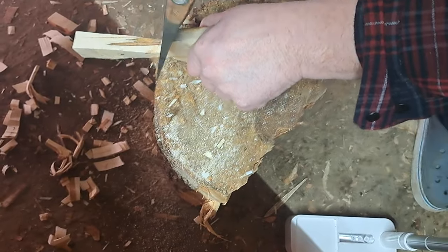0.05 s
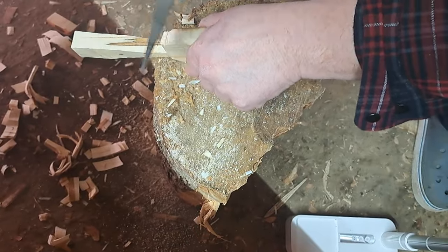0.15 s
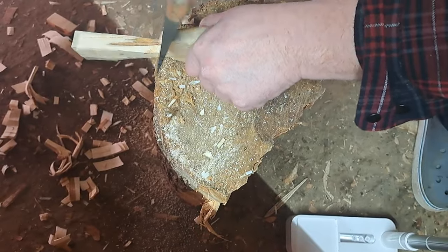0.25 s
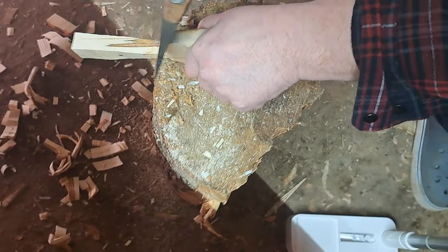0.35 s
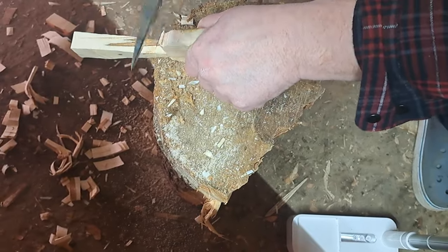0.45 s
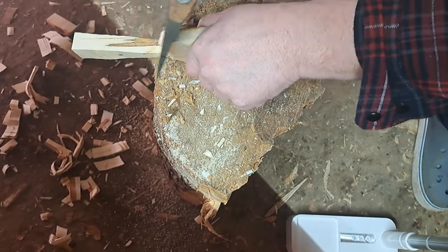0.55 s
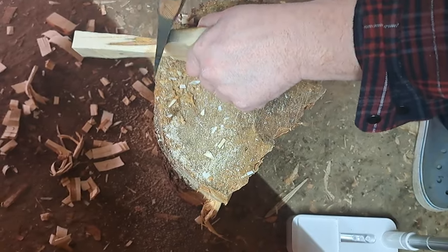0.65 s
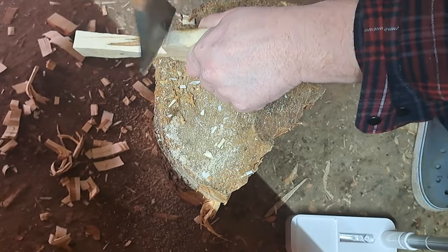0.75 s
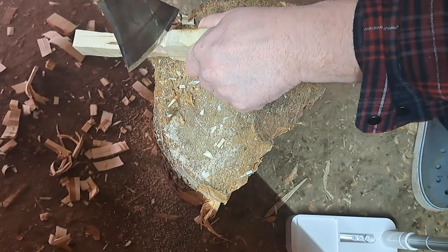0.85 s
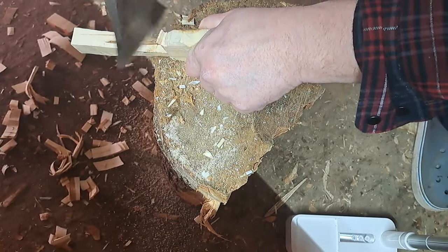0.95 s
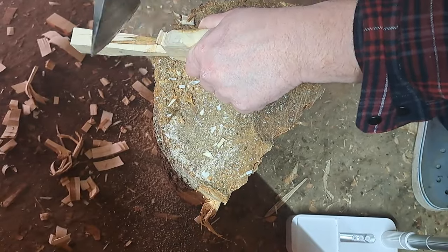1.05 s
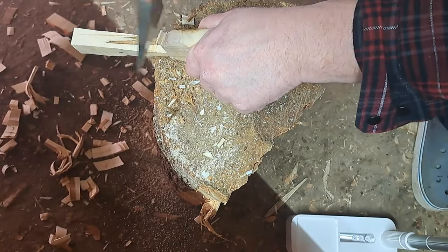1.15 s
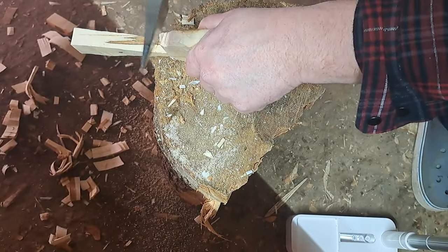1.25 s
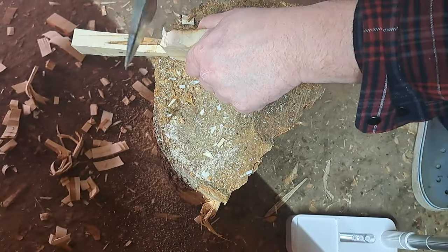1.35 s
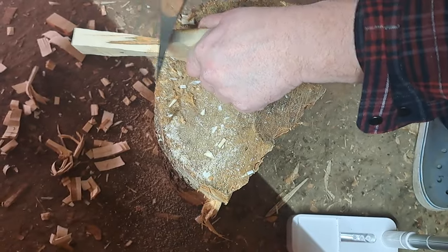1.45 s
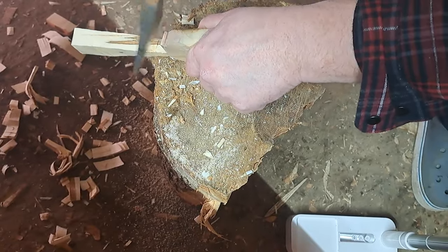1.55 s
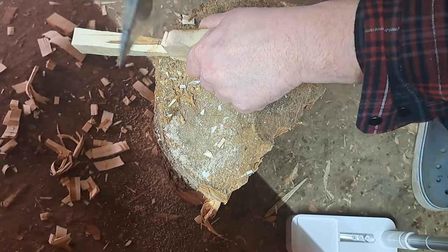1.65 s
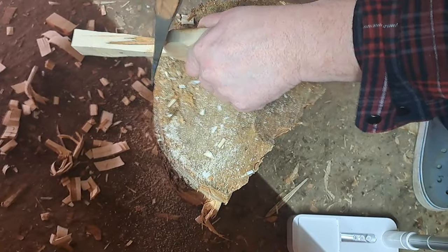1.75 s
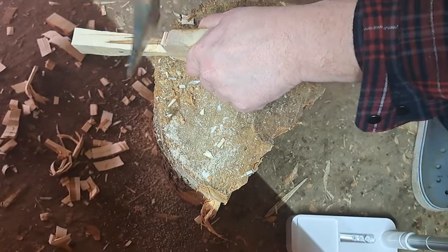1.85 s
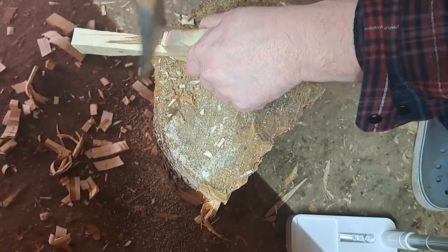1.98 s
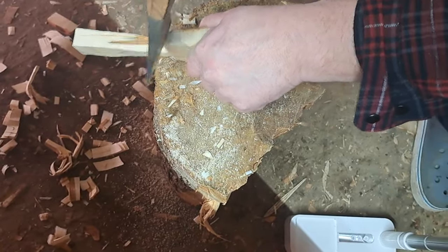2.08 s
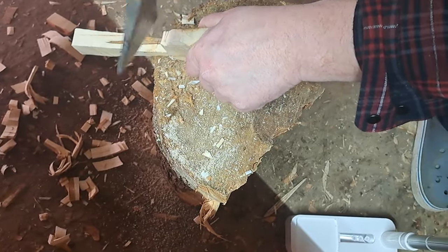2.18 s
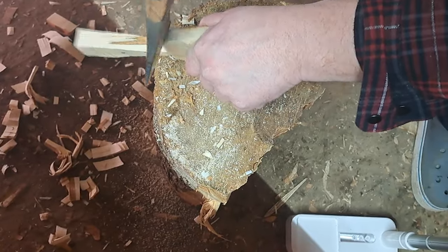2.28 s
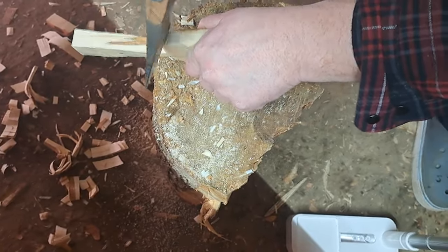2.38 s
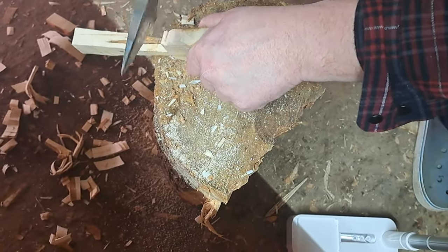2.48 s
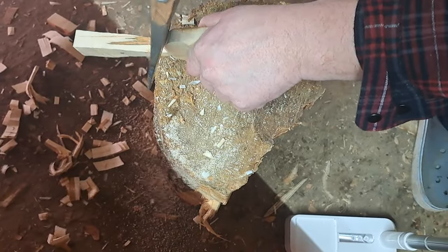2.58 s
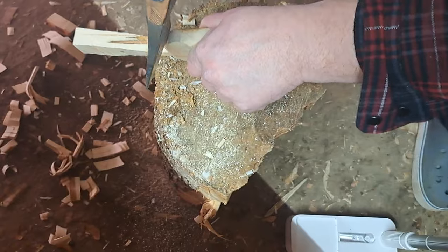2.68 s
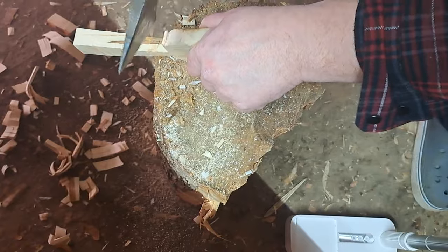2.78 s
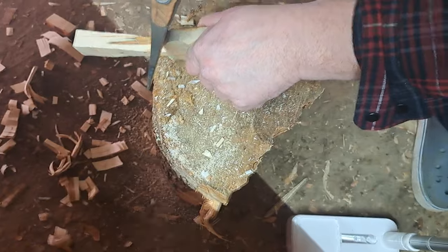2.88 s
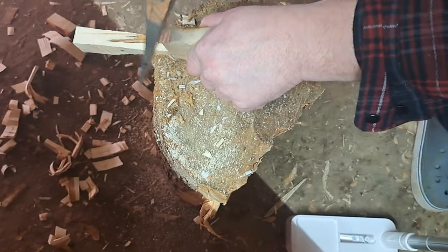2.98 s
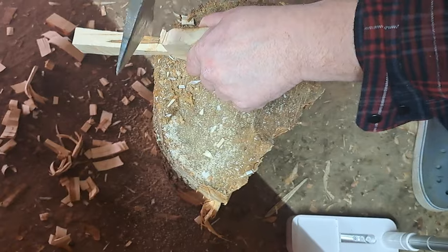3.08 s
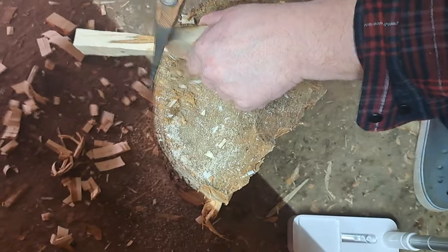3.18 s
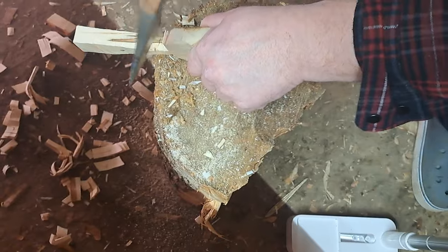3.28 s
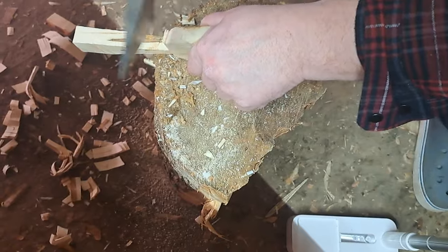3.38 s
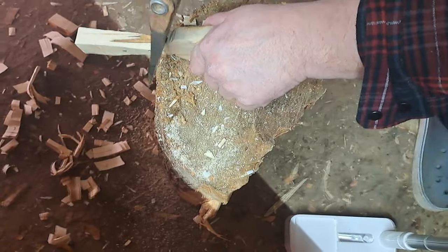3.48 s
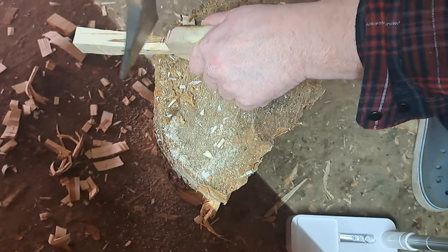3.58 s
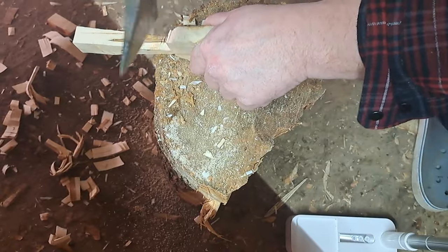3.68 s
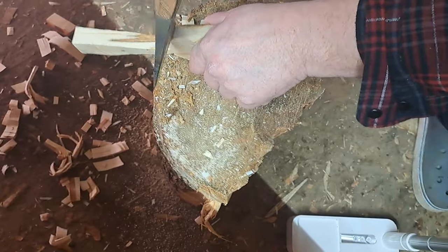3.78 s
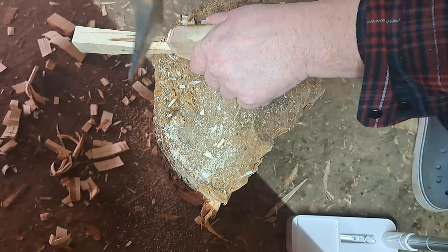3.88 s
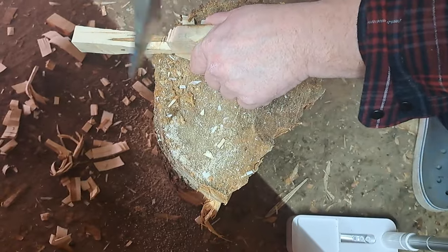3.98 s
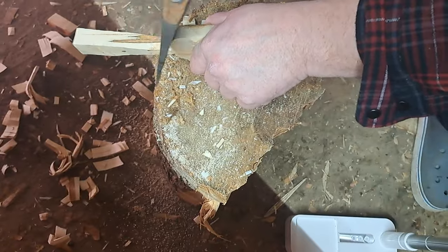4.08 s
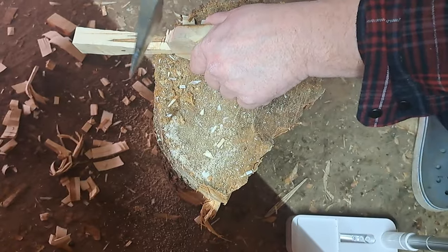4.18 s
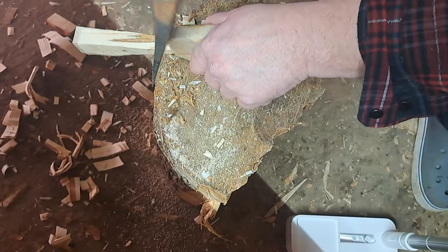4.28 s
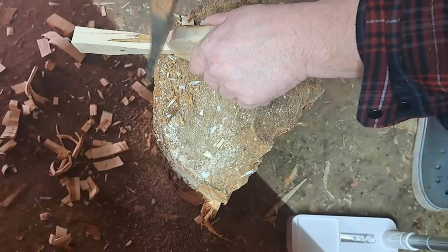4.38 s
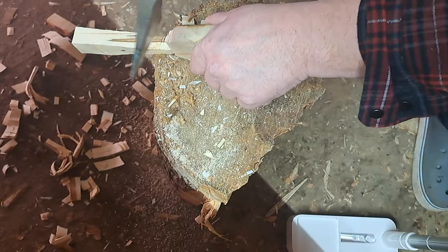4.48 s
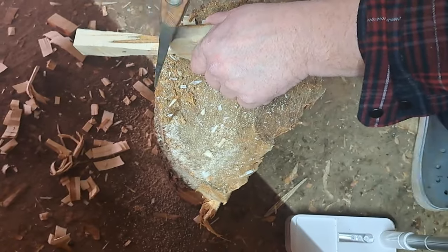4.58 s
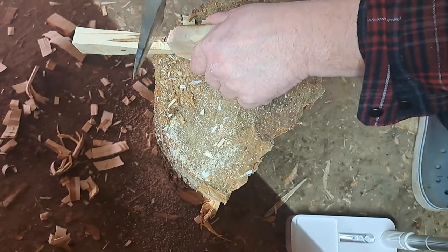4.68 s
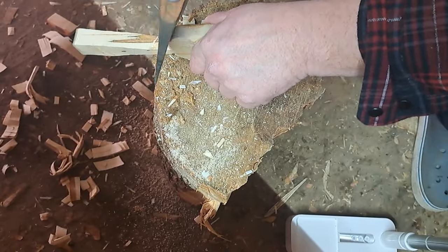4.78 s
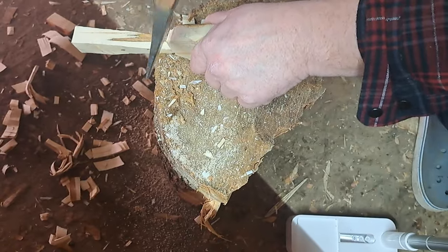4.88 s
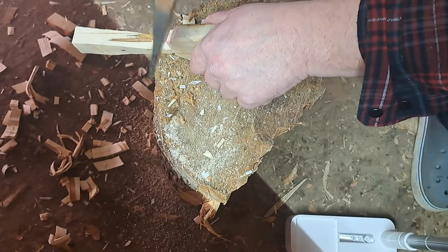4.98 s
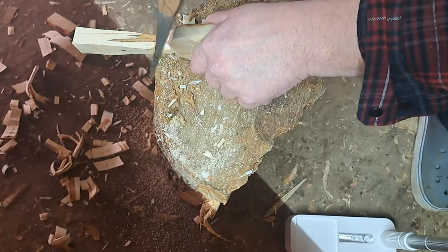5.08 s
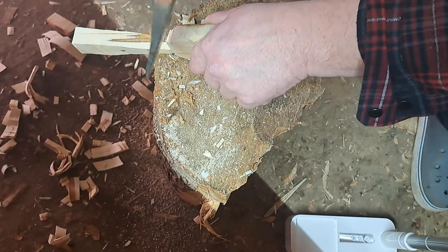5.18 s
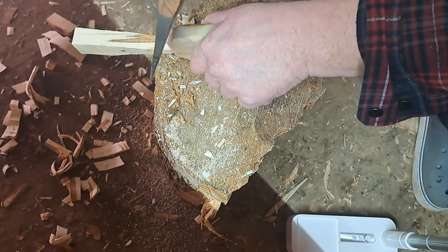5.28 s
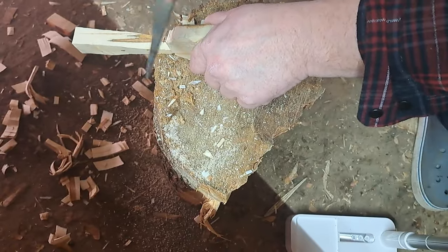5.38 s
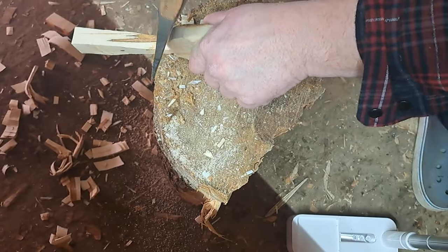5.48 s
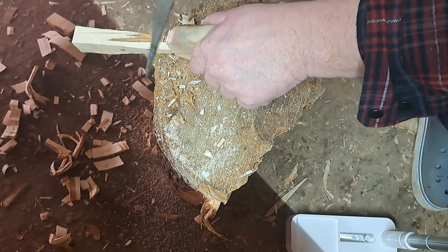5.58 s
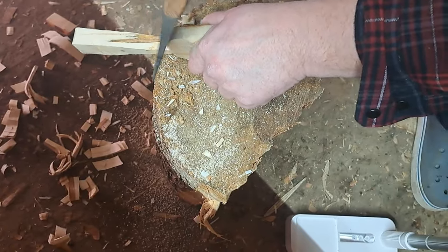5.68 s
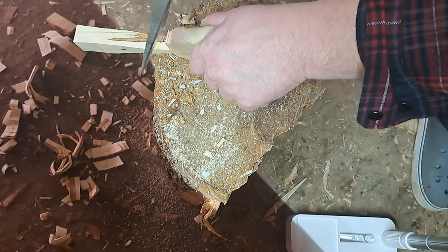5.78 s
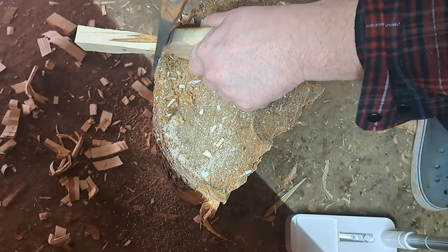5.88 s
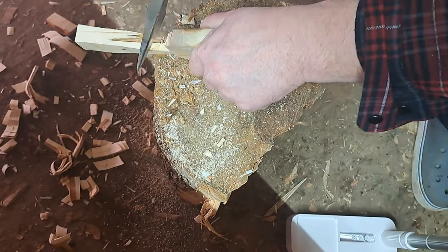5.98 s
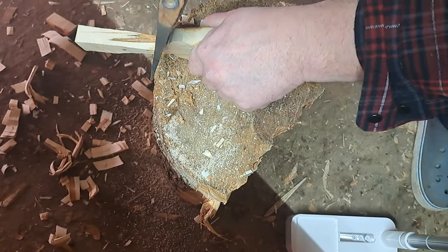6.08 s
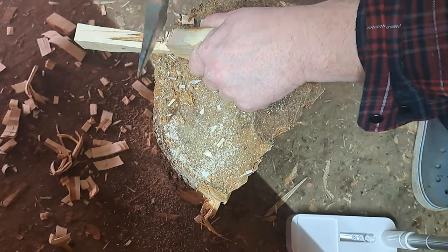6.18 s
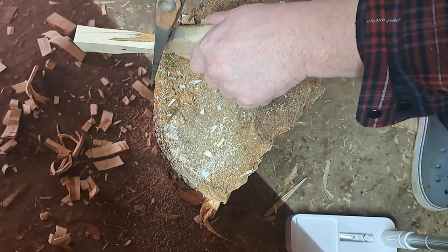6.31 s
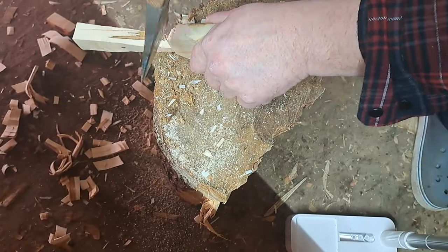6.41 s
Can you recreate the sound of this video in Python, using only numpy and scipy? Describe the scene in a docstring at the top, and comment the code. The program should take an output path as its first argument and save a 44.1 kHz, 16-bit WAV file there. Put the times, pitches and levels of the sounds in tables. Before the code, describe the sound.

In a small workshop with faint low rumble and hiss, a small axe chops a wooden spoon blank on a block, heard close in stereo. Three hard, clacking strokes fall at 0.0, 0.3 and 0.6 s, each a short crack of fibres followed at once by a low block thump and brief rattle. A pause holds only tiny chip ticks near 0.8 and 1.0 s. A light tap at 1.45 s restarts the chopping, with a soft wooden rub at 1.65 s. Strokes then come about every 0.29 s, growing to bright, strong cracks at 2.9 and 3.2 s; a chip snaps off at 3.5 s and the blank slides softly near 3.7 s. From 3.8 s the strokes are lighter, with a knockier block, quickening to about five per second. The last, from 5.9 to 6.3 s, are soft, crisp slices with faint splitting snaps.

```python
"""Chopping a spoon blank with a small axe

A small axe chops a wooden spoon blank held on a block, in quick runs, in a small workshop with rumble and hiss.
Each stroke is a noise burst of snapping fibres that excites the damped modes of the blank; then the block's
decaying modes knock and thump on the floor. After hard strokes the blank rattles, as a series of short contacts.
Now and then the blank slides, a chip splits off late and twangs, or a chip lands with a tick."""
import sys
import numpy as np
from scipy import signal
from scipy.fft import rfft, irfft
from scipy.io import wavfile
from scipy.ndimage import uniform_filter1d

SR = 44100
rng = np.random.default_rng(int(sys.argv[2]) if len(sys.argv) > 2 else 0)


def wav_out(sig):
    """Save sig, one row per channel (or a flat mono array), as 16-bit PCM at SR to the path in sys.argv[1]."""
    wavfile.write(sys.argv[1], SR, np.round(np.clip(np.atleast_2d(sig).T, -1, 1) * 32767).astype(np.int16))


N = 284443

TIME = np.arange(SR) / SR  # one second of ringing [s]
SHORT = TIME[:SR // 5]  # the first fifth of it [s]

# Levels are those in the mix, ahead of the gain curve in record().
# axe strokes: (time [s], bite before the edge stops [s], pitch of the blank [Hz], load on the block [dB],
# clack level [dB], brightness [dB])
STROKES = [(0.0139, 0.002, 1555, -20, -16.5, -14), (0.301, 0.0027, 1520, -23, -16.5, 1.5),
           (0.585, 0.0011, 1328, -22, -25, -12), (1.4553, 0.00094, 786, -34, -37.5, 7),
           (1.7603, 0.0018, 1075, -25.5, -32.5, -2.5), (2.0439, 0.0015, 813, -19.5, -25.5, 1.5),
           (2.3283, 0.0018, 866, -20, -23.5, -1), (2.613, 0.0014, 1170, -20, -21, -1),
           (2.902, 0.0041, 1710, -21, -18, 11.5), (3.19, 0.0049, 1645, -23.5, -16, -1),
           (3.469, 0.0025, 1290, -23.5, -25.5, 2), (3.797, 0.0014, 851, -32.5, -35.5, -4),
           (4.0726, 0.00096, 1486, -36, -31.5, 2.5), (4.333, 0.00095, 1206, -30, -29.5, -5.5),
           (4.581, 0.0015, 875, -31, -42, 14), (4.82, 0.0016, 1156, -28, -32, -2),
           (5.047, 0.0013, 880, -31.5, -29, -5.5), (5.2537, 0.0019, 1180, -30, -26, -18),
           (5.461, 0.0023, 1540, -29, -28, -8.5), (5.669, 0.0018, 1213, -26.5, -27, -16.5),
           (5.881, 0.0038, 1247, -31, -47, 14), (6.1, 0.0026, 1273, -30, -42.5, 14.5),
           (6.322, 0.003, 1230, -29, -42, -1)]
# chips splitting off late, shortly after the edge has stopped: (time [s], pitch [Hz], crack level [dB])
CHIP_SPLITS = [(3.4823, 4350, -35), (4.342, 1210, -54), (4.591, 898, -63), (4.827, 1320, -62),
               (5.6831, 1300, -52), (5.9073, 5620, -47), (5.9127, 6330, -45), (6.1271, 5220, -44),
               (6.3449, 5060, -45.5), (6.347, 5180, -45.5)]


def from_db(db):
    """Logarithmic level turned into an amplitude ratio."""
    return 10 ** (np.asarray(db) / 20)


def at_hz(table, hz):
    """Interpolation of every column of a table at one point of a logarithmic frequency axis."""
    freqs, *columns = np.transpose(table)
    return [np.interp(np.log(hz), np.log(freqs), column) for column in columns]


def band(x, low_hz, high_hz, order=3):
    """Causal Butterworth band-pass."""
    sos = signal.butter(order, [low_hz, high_hz], "band", fs=SR, output="sos")
    return signal.sosfilt(sos, x + 1e-18)


def pan(db):
    """Level-difference stereo: left and right gains that differ by db."""
    return from_db(np.array([[db], [-db]]) / 2)


def at_level(x, db, seconds):
    """Rms normalization: the loudest stretch of the given length gets this level."""
    window = max(1, int(seconds * SR))
    power = uniform_filter1d(np.mean(x ** 2, axis=0), window, mode="constant")
    return x * from_db(db) / np.sqrt(power.max() + 1e-20)


def add(out, s, sound):
    """Superposition: mixes a sound in at time s."""
    start = max(0, int(s * SR))
    out[:, start:start + sound.shape[-1]] += sound[..., :N - start]


def convolve(x, response):
    """Linear system: x convolved with an impulse response, keeping one second at most."""
    return signal.fftconvolve(np.atleast_2d(x), np.atleast_2d(response), axes=-1)[:, :SR]


def resonance(x, hz, width_hz):
    """Damped mode as a two-pole filter, with gain 1 at its top."""
    r = np.exp(-np.pi * width_hz / SR)
    poles = [1, -2 * r * np.cos(2 * np.pi * hz / SR), r * r]
    return (1 - r * r) / 2 * signal.lfilter([1, 0, -1], poles, x + 1e-18)


def ringing(modes, t, tuning=1):
    """Modal synthesis: the exponentially decaying sines of a struck body."""
    return sum(from_db(db - 60 * t / t60) * np.sin(2 * np.pi * hz * tuning * t) for hz, db, t60 in modes)


def noise_bands(size):
    """Half-octave bands of noise, uncorrelated left and right: (centre [Hz], noise)."""
    edges = np.geomspace(22, 18000, 20)
    # neighbouring bands take turns between two independent noises
    white = rng.standard_normal((2, 2, size))
    return [(np.sqrt(low * high), band(white[k % 2], low, high, order=2))
            for k, (low, high) in enumerate(zip(edges, edges[1:]))]


def air():
    """Broadband background noise: low rumble and faint hiss, slowly swelling and sinking below 8 kHz."""
    # spectrum of still air and hiss: (frequency [Hz], relative density [dB per Hz])
    spectrum = [(25, -9), (60, -3.5), (130, -12.5), (300, -12.5), (700, -25), (1400, -25.5), (2300, -25.5),
                (4500, -29), (7000, -41), (9500, -53.5), (12700, -30.5), (15500, -52.5)]
    # course of the swell, of which only the deviation from its mean counts: (time [s], level [dB])
    course = [(0.0, -56), (0.14, -68), (1.11, -76), (1.99, -56.5), (3.2, -56.5), (4.26, -67.5),
              (5.84, -76.5), (6.45, -57)]
    swing_share, steady_above_hz, air_db = .65, 8000, -54
    times, db = np.transpose(course)
    swing_db = swing_share * np.interp(np.arange(N) / SR, times, db - db.mean())
    swell = from_db(swing_db)
    total = 0
    for hz, noise in noise_bands(N):
        coloured = noise * from_db(*at_hz(spectrum, hz))
        total = total + coloured * (swell if hz < steady_above_hz else 1)
    return at_level(total, air_db, 2)


def hiss():
    """Resonantly filtered noise: two steady faint bands, uncorrelated left and right."""
    # bands standing out of the hiss: (frequency [Hz], width of each of two equal filters [Hz], level [dB])
    hiss_bands = [(2240, 520, -75.5), (12500, 1900, -78)]
    out = 0
    for hz, width_hz, db in hiss_bands:
        once = resonance(rng.standard_normal((2, N)), hz, width_hz)
        out = out + at_level(resonance(once, hz, width_hz), db, 2)
    return out


def workshop(build_s=0.0073):
    """Diffuse reverberation: noise with a quick early decay over a faint long one, at unit energy."""
    # early decay: (frequency [Hz], t60 [s])
    early_decay = [(50, 0.75), (200, 0.13), (500, 0.25), (1400, 0.12), (4000, 0.15), (8000, 0.089),
                   (14000, 0.072)]
    # faint late ring: (frequency [Hz], t60 [s], level relative to the early part [dB])
    late_decay = [(50, 1.1, -10), (200, .75, -17), (500, .6, -18), (1400, .46, -28), (4000, .46, -22),
                  (8000, .4, -24), (14000, .3, -27)]
    # balance of the diffuse sound: (frequency [Hz], left minus right [dB])
    balance = [(60, -4.5), (300, 1.5), (1500, -5.5), (4000, -6.5), (8000, 2), (14000, 7)]
    response = 0
    for hz, noise in noise_bands(SR):
        (early_t60,), (late_t60, late_db) = at_hz(early_decay, hz), at_hz(late_decay, hz)
        decay = from_db(-60 * TIME / early_t60) + from_db(late_db - 60 * TIME / late_t60)
        response = response + noise * decay * pan(*at_hz(balance, hz))
    response = response * (1 - np.exp(-TIME / build_s))
    return response / np.sqrt(np.sum(response ** 2) / 2)


def slides():
    """Friction noise: wood rubs softly on wood as the blank is shifted on the block."""
    # rubs with a bell-shaped course: (centre time [s], standard deviation [s], level at the centre [dB])
    rubs = [(1.646, 0.022, -54), (3.672, 0.048, -58.5)]
    t = np.arange(N) / SR
    pressure = sum(from_db(db) * np.exp(-.5 * ((t - s) / length) ** 2) for s, length, db in rubs)
    return pressure * at_level(band(rng.standard_normal((2, N)), 330, 2900, order=2), 0, 1)


def landings(pitch_hz=4500):
    """Light impacts: fallen chips tick with one shared pitch and colour."""
    # chips landing: (time [s], level [dB])
    falls = [(.834, -68), (0.971, -68.5), (2.455, -60.5), (2.739, -56), (3.662, -58), (3.8823, -60.5),
             (4.6579, -62.5)]
    # relative level of each part: (clack [dB], crack [dB], tearing [dB])
    colour_db = (-1.5, 1.5, -2.5)
    return [(s, pitch_hz, *(db + np.array(colour_db))) for s, db in falls]


def splinters(pan_db=3):
    """Free vibration: each chip that splits off twangs for a moment at its pitch."""
    relative_db, t60_s = -2.5, 0.096  # relative to its crack
    out = np.zeros((2, N))
    for s, hz, db in CHIP_SPLITS:
        add(out, s, ringing([(hz, db + relative_db, t60_s)], SHORT) * pan(pan_db))
    return out


def splitting():
    """Size scaling of fracture: big, low-pitched chips come off with more clack, small ones with a bright snap."""
    even_hz = 7600  # here clack and crack are equal
    clack_db_per_octave, tearing_db = 10, 2.5
    return [(s, hz, db + clack_db_per_octave * np.log2(even_hz / hz), db, db + tearing_db)
            for s, hz, db in CHIP_SPLITS]


def bounces(pitch_hz=2400):
    """Repeated impact: a heavy stroke makes the blank bounce, more with the load, less after a deep bite."""
    # bounces against block and blade: (time after the edge stops [s], level relative to the load [dB])
    rebounds = [(0.0233, 0), (.048, -12.5), (0.0525, -2), (0.08, -21)]
    # relative level of each part: (clack [dB], crack [dB], tearing [dB])
    colour_db = (-2, -6.5, -23.5)
    bounce_above_db = -26.5  # lighter loads leave the blank lying still
    hold_db_per_s = 2201  # loss per second of bite: a deep edge holds the blank still
    contacts = []
    for s, bite_s, _, load_db, _, _ in STROKES:
        if load_db > bounce_above_db:
            for delay_s, relative_db in rebounds:
                db = load_db - hold_db_per_s * bite_s + relative_db
                contacts.append((s + bite_s + delay_s, pitch_hz, *(db + np.array(colour_db))))
    return contacts


def small_cracks(room, table, stop_s, room_db, bite_s=0.00074, creak_db=-30, top_hz=12000):
    """Brief contacts of wood, too light to move the block; rows are (time [s], pitch [Hz], three levels [dB])."""
    out = np.zeros((2, N))
    for s, pitch_hz, *levels in table:
        sound = crack(room, levels, pitch_hz, bite_s, stop_s, room_db, window_s=.004,
                      top_hz=top_hz, creak_db=creak_db)
        add(out, s, sound)
    return out


def sway(thump_db, detune=0.056):
    """Lightly damped floor modes: a slow ring started by the thump, growing less than the thump does."""
    # floor modes: (frequency before detuning [Hz], relative level [dB], t60 [s])
    floor_modes = [(45.47, 2, 0.81), (63.5, -19, .45), (79.6, 4, 0.14)]
    middling_sway_db, middling_thump_db, growth_share = -30, -29.5, .1
    swell = 1 - np.exp(-TIME / 0.0065)
    db = middling_sway_db + growth_share * (thump_db - middling_thump_db)
    floor = from_db(db) * swell * ringing(floor_modes, TIME, 1 + detune * rng.normal())
    return floor * np.array([[1], [-.6]])  # out of step at the two microphones


def block(room, levels, contact_s=0.002, room_db=-5, detune=0.019, thump_wall_db=-13, thump_room_db=-16):
    """Impact excitation: a soft push starts the block's modes; the walls reflect them, the lowest only weakly."""
    # block standing on the floor: (frequency before detuning [Hz], relative level [dB], t60 [s])
    block_modes = [(72.5, 3.5, 0.12), (96.4, -6.5, 0.21), (111, -5, 0.086), (142, -3, 0.06),
                   (156.2, 3, 0.12), (204.4, -5, 0.18), (235.3, -1.5, 0.087), (268.2, -6, 0.073),
                   (290.3, -1.5, 0.028), (382, -27, 0.13)]
    # thump, thud and knock: (lowest mode [Hz], highest mode [Hz])
    mode_ranges = [(40, 120), (120, 220), (220, 500)]
    # bass reflections between the walls: (delay [s], relative level [dB])
    reflections = [(0.0297, -3.5), (0.0604, -7), (0.0683, -13), (0.13, -19)]
    # balance of the block: (frequency [Hz], left minus right [dB])
    balance = [(60, 1.5), (160, -1), (360, -1)]
    radiation_low_hz = 65  # the block radiates little below this
    push = np.hanning(max(3, int(contact_s * SR)))
    tuning = 1 + detune * rng.normal()
    returns = [(thump_wall_db, thump_room_db), (0, room_db), (0, room_db)]
    out = 0
    for (low, high), db, (wall_db, diffuse_db) in zip(mode_ranges, levels, returns):
        modes = [mode for mode in block_modes if low <= mode[0] < high]
        struck = convolve(push, ringing(modes, TIME, tuning))[0]
        # a small body radiates little below its lowest mode
        body = band(struck, max(radiation_low_hz, low / 2), 4 * high, order=3)
        echoes = sum(from_db(gain_db + wall_db) * np.interp(TIME - delay, TIME, body, left=0)
                     for delay, gain_db in reflections)
        sound = body + echoes + from_db(diffuse_db) * convolve(body, room)
        out = out + at_level(sound, db, 0.091) * pan(*at_hz(balance, np.sqrt(low * high)))
    return out


def evened(force, size=160):
    """Spectral whitening: many small fractures together push about equally hard at all frequencies."""
    spectrum = rfft(force, 2 * len(force))
    power = uniform_filter1d(np.abs(spectrum) ** 2, size)
    return irfft(spectrum / np.sqrt(np.abs(power) + 1e-12))[:len(force)]


def wood(force, pitch_hz, main_width_hz=330, main_db=3, shift=0.031, lag_s=0.00032):
    """Forced damped modes of the blank, the main one set by where it is struck: (motion, direct sound)."""
    # blank with the blade in it: (frequency before a random shift [Hz], width [Hz], level [dB])
    blank_modes = [(445, 130, -3.5), (722, 280, -1), (1030, 590, -0.5), (1287, 377, 3.5), (1668, 650, 2),
                   (2410, 910, 0.5), (3215, 290, -2), (3900, 520, -9.5), (5175, 340, -8.5),
                   (6085, 210, -12), (7515, 1200, -23.5), (11700, 1790, -16), (12520, 1500, -14),
                   (15200, 2500, -34)]
    # balance of the direct sound: (frequency [Hz], left minus right [dB])
    balance = [(500, -4.5), (1500, 6), (4000, -2), (7000, 12), (10000, 17), (15000, 25.5)]
    # the blank faces the microphones, so its direct sound is strong in the low modes: (frequency [Hz], gain [dB])
    facing = [(450, -3), (1000, 8.5), (1300, 6.5), (1800, 0), (3000, 2), (6000, 2.5), (14000, -13)]
    motion, direct = 0, 0
    modes = [(hz * np.exp(shift * rng.normal()), width, db) for hz, width, db in blank_modes]
    force = force + from_db(main_db) * resonance(force, pitch_hz, main_width_hz)
    for k, (hz, width, db) in enumerate(modes):
        mode = resonance(force, hz, width) * (-1) ** k * from_db(db)  # signs alternate
        motion = motion + mode
        # the sound reaches the left microphone first
        pair = np.array([mode, np.interp(SHORT - lag_s, SHORT, mode, left=0)])
        direct = direct + pair * pan(*at_hz(balance, hz)) * from_db(*at_hz(facing, hz))
    return motion, direct


def in_ranges(sound, levels, window_s, top_hz, db_per_octave=9):
    """Band-wise levels of clack, crack and tearing; the more the fibres tear, the higher the crack reaches."""
    # clack, crack and tearing: (low edge [Hz], high edge [Hz])
    ranges = [(380, 2500), (2400, 8000), (8300, 17000)]
    clack, snap, tearing = (band(sound, *edges) for edges in ranges)
    # top_hz is reached when tearing lies 24 dB below the crack
    reach_octaves = (levels[2] - levels[1] + 24) / db_per_octave
    reach_hz = np.clip(top_hz * 2 ** reach_octaves, 3300, 14000)
    snap = signal.sosfilt(signal.butter(3, reach_hz, fs=SR, output="sos"), snap)
    return sum(at_level(part, db, window_s) for part, db in zip((clack, snap, tearing), levels))


def crack(room, levels, pitch_hz, bite_s, stop_s, room_db, window_s, top_hz=5500,
          bite_db=-15, creak_db=-22, creak_s=0.0043):
    """Fracture noise: fibres snap in a swelling burst until the edge stops; a few more give way afterwards."""
    # steel head, ringing faintly: (frequency [Hz], relative level [dB], t60 [s])
    head_modes = [(1594, -53, 0.19), (2315, -64, 0.05), (6840, -62.5, .13)]
    after = SHORT - bite_s
    rise = from_db(-bite_db * np.minimum(after, 0) / bite_s)
    burst = np.where(after < 0, rise, np.exp(-np.abs(after) / stop_s))
    stragglers = from_db(creak_db) * np.exp(-SHORT / creak_s) * rng.standard_normal(len(SHORT)) ** 2
    force = evened((burst + stragglers) * rng.standard_normal(len(SHORT)))
    motion, direct = wood(force, pitch_hz)
    head = convolve(motion, ringing(head_modes, SHORT))[:, :len(SHORT)]
    sound = from_db(room_db) * convolve(motion, room)
    sound[:, :len(SHORT)] += direct + head
    return in_ranges(sound, levels, window_s, top_hz)


def chops(room, block_lag_s=0.003546, bass_spread=0.45, stop_s=0.0014, room_db=1):
    """Fracture, then impact: each stroke cracks the blank and, once the edge has stopped, loads the block."""
    # the knock comes nearer to the thump from about 4.3 to 5.6 s, then drops back:
    # (time [s], knock relative to the load [dB])
    knock = [(0, -6), (2.2, -7), (3.9, -6), (4.3, -0.5), (5.6, -1), (6.3, -7)]
    # crack and tearing relative to the clack; tearing takes all of the brightness, the crack a share
    crack_db, tearing_db, crack_share = -6, -19.5, 0.27
    thump_db, thud_db = 0, -1.5  # relative to the load
    out = np.zeros((2, N))
    # long waves reach both microphones nearly alike
    bass_room = room[0] + bass_spread * room[1] * np.array([[1], [-1]])
    for s, bite_s, pitch_hz, load_db, clack_db, bright_db in STROKES:
        wood_db = clack_db + np.array([0, crack_db + crack_share * bright_db, tearing_db + bright_db])
        block_db = load_db + np.array([thump_db, thud_db, np.interp(s, *np.transpose(knock))])
        add(out, s, crack(room, wood_db, pitch_hz, bite_s, stop_s, room_db, window_s=.02))
        add(out, s + bite_s + block_lag_s, block(bass_room, block_db) + sway(block_db[0]))
    return out


def scene():
    """Superposition of the background and all the woodwork, whose impacts share one room response."""
    room = workshop()
    background = air() + hiss()
    chips = small_cracks(room, landings(), stop_s=0.00058, room_db=6)
    splits = small_cracks(room, splitting(), stop_s=0.0025, room_db=-1.5) + splinters()
    rattle = small_cracks(room, bounces(), stop_s=.0008, room_db=-7.5)  # very short contacts
    return background + slides() + chips + splits + rattle + chops(room)


def record(dry):
    """Soft saturation and low-pass: a slight gain, the highest peaks rounded, the top cut above 16.2 kHz."""
    rounded = 1.535 * np.tanh(dry / 1.292)
    return signal.sosfilt(signal.ellip(10, .2, 80, 16200, fs=SR, output="sos"), rounded)


dry = scene()
out = record(dry)
wav_out(out)
```